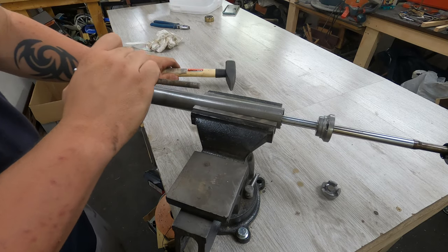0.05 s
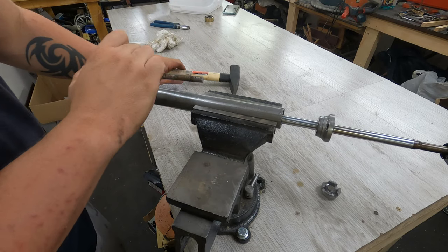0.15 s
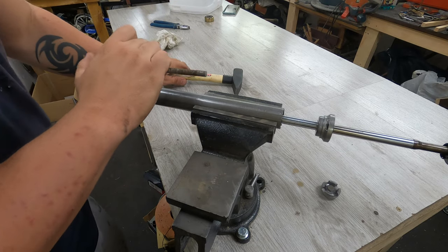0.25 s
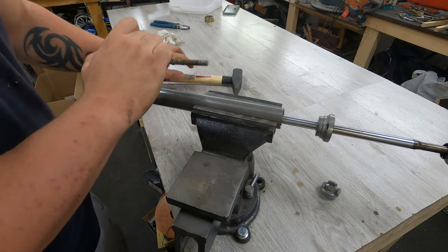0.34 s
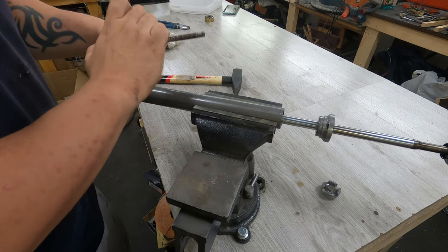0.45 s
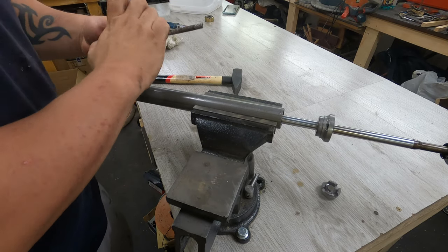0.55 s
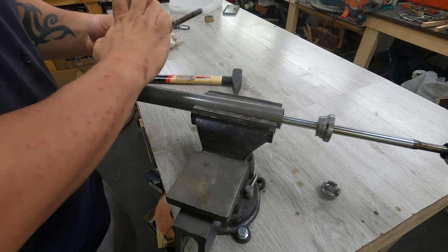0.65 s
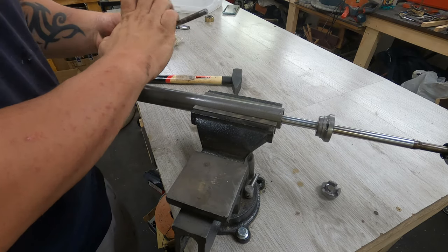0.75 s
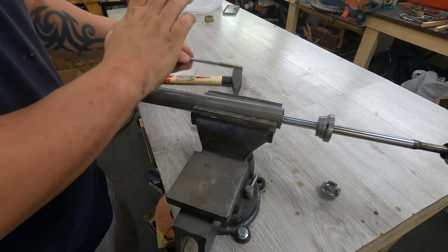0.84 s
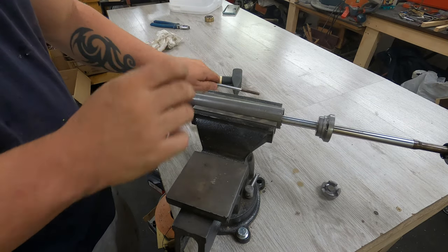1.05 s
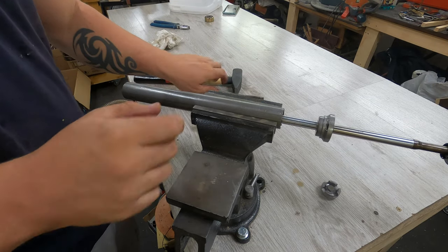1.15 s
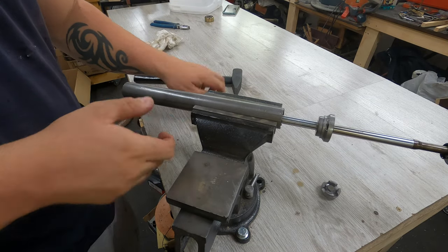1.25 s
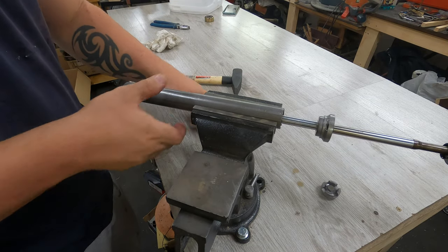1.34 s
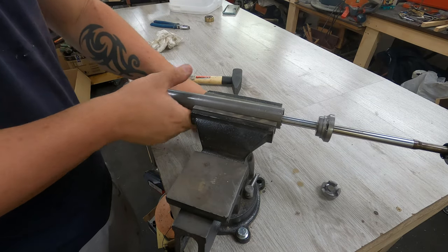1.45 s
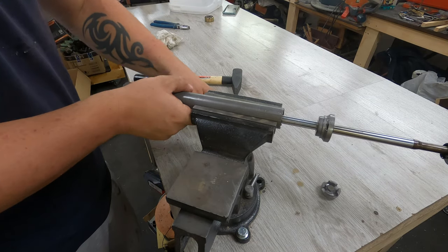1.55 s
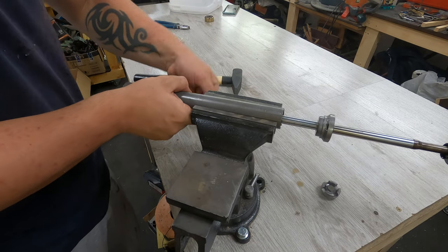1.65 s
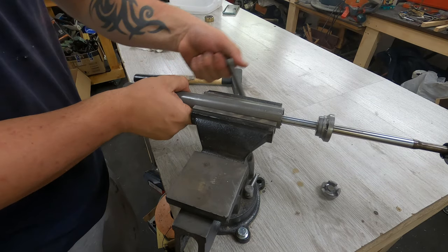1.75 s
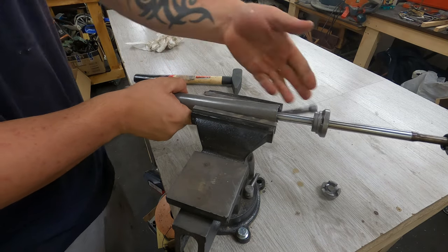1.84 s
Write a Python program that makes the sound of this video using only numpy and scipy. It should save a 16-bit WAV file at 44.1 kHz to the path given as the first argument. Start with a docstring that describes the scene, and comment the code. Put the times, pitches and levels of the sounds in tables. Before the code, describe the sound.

A steel tube thuds rapidly in a vise, a rod clanks against it, and after a short gap it lands with a ringing rattle; a small tap follows, over faint low hum in a small workshop, heard close in stereo.

```python
"""Steel parts at a bench vise

In a small, live workshop, with a stereo pair facing the vise almost straight on, steel parts are taken apart.
The tube thuds in the jaws, the rod clanks on it and is put down with a ping and a clatter; one light tap follows.
Each blow is a click and a noise crack, with decaying sine modes and a room response built from noise.
Behind it are two wavering hum tones, and shaped noise for the room air and a hand sliding on steel."""
import sys
import numpy as np
from scipy import signal
from scipy.fft import rfft, irfft
from scipy.io import wavfile

SR = 44100
rng = np.random.default_rng(int(sys.argv[2]) if len(sys.argv) > 2 else 0)


def output_pcm(signal):
    """Save a mono or channel-first signal as 16-bit PCM at the path in sys.argv[1].

    Samples are clipped to [-1, 1] before scaling.
    """
    pcm = np.clip(np.atleast_2d(signal).T, -1, 1) * 32767
    wavfile.write(sys.argv[1], SR, np.round(pcm).astype(np.int16))


N = 81585
BLOW_SIZE = 32768   # samples in the longest tail of a blow
TIME = np.arange(N) / SR   # s from the start of the scene
AGE = np.arange(BLOW_SIZE) / SR   # s from the start of a blow
BINS_HZ = np.maximum(np.fft.rfftfreq(BLOW_SIZE, 1 / SR), 1)

# hum: two tones and the level of each, (time [s], level [dB])
LOW_HUM_HZ, HIGH_HUM_HZ = 43.6, 97.9
LOW_HUM_LEVEL = [(0, -45.5), (.15, -45.5), (.3, -46.5), (.65, -54.5), (.9, -44.5), (1.1, -46.5), (1.3, -67),
                 (1.6, -48), (1.85, -66)]
HIGH_HUM_LEVEL = [(0, -57), (.7, -62), (.86, -51), (1.05, -60), (1.42, -65.5), (1.58, -48.5), (1.85, -54.5)]
# room air: (time [s], level [dB]), then its spectrum shape, (frequency [Hz], relative density [dB])
AIR_LEVEL = [(0, -46.5), (.22, -51.5), (.75, -51.5), (1.15, -50.5), (1.5, -54), (1.85, -48)]
AIR_COLOUR = [(20, -2.5), (45, 5), (70, -4.5), (110, -11), (160, -18), (320, -24), (500, -34.5), (800, -43),
              (1150, -34.5), (1800, -37.5), (2600, -43.5), (7000, -51), (9500, -61.5), (16000, -70.5)]
# hand sliding on steel: (time [s], level [dB]), then its shape, (frequency [Hz], relative density [dB])
BRUSH_LEVEL = [(0, -110), (.08, -89), (.14, -96), (.22, -85.5), (1.0, -100), (1.73, -83), (1.79, -63),
               (1.85, -72)]
BRUSH_COLOUR = [(300, -8.5), (1000, 0), (1800, 13), (2800, 0), (6500, 2.5), (9500, -7.5), (16000, -23)]

# likeness of left and right in diffuse sound: (frequency [Hz], likeness [0-1])
LIKENESS = [(100, 0.98), (300, 0.95), (700, 0.79), (1400, 0.7), (2800, 0.65), (5500, 0.37), (11000, .1)]
# decay of the workshop: (frequency [Hz], t60 [s])
ROOM_T60 = [(100, 1), (220, 0.36), (340, 0.2), (700, 0.26), (1500, 0.29), (3000, 0.31), (6000, 0.32),
            (12000, 0.39)]
# spectrum shape of the reflections: (frequency [Hz], relative level [dB])
ROOM_COLOUR = [(60, -5.5), (160, 1.5), (400, -3), (1000, 5), (2000, 3), (4000, -0.5), (7000, -6),
               (14000, -8)]
ROOM_BUILD_S, ROOM_PAN_DB = 0.0083, 1.65   # rise of the reflections; left over right

# blows: (time [s], level [dB], bass [dB], treble [dB], room [dB])
# light touches on the metal
TOUCHES = [(.1030, -30.5, -19, 6, -2), (1.5258, -12.5, -4, -21, 0), (1.8445, -21.5, 16, -2.5, 1.5)]
# a small steel part is tapped once
TAPS = [(1.5590, -1, 8.5, -2, -4)]
# the rod lands and rattles on the bench
CLATTER = [(1.1828, -16, -12, 4.5, -3), (1.1960, 4, 8, -1, -1), (1.2560, 0, 5.5, 14, 3.5),
           (1.2582, 13.5, -3.5, -9, -22), (1.3140, -3.5, 5.5, 3.5, 2.5), (1.3218, 3.5, -9, 7.5, 3),
           (1.3275, 0, 8, 1, -7), (1.3505, 2, 0, -12, -3), (1.3680, -2.5, -15, -0.5, -11),
           (1.3880, -3, -26.5, 5, 0)]
# the rod knocks on the tube
CLANKS = [(.4112, 9.5, 2, 2, 2), (.4722, 7, -0.5, -1.5, 4.5), (.5068, 4, -3, -12, 5)]
# the tube shifts in the vise
THUDS = [(.2338, -7, -0.5, -9.5, 1.5), (.2440, 16.5, -6.5, -2.5, 2), (.2800, 17, -3.5, -11.5, 2),
         (.2905, 14.5, -7, -15.5, -1), (.3225, 4, 14, -0.5, 0), (.3755, -2.5, 12, -8.5, -7.5)]

# colour of each kind of blow: (frequency [Hz], relative level [dB])
TOUCH_COLOUR = [(60, -7.5), (230, 7), (600, -4), (1000, -10), (2400, 2), (4500, -5.5), (7000, -21),
                (16000, -40.5)]
TAP_COLOUR = [(60, -14), (240, -15.5), (450, -3), (850, -7.5), (1350, 1), (1800, 1), (2100, -8),
              (2500, -7.5), (3000, -5.5), (4500, -9), (6000, -16.5), (9000, -35.5), (16000, -64)]
CLATTER_COLOUR = [(50, -44), (110, -9.5), (175, -3), (380, -4), (620, 1), (900, -9.5), (1450, -1.5),
                  (2300, -3.5), (2950, -2.5), (4000, -5.5), (5600, -7.5), (7500, -17.5), (8500, -27.5),
                  (11000, -40), (16000, -45)]
CLANK_COLOUR = [(50, -9.5), (140, 1.5), (500, -0.5), (900, -10.5), (1650, -5.5), (2100, -8.5), (2700, -4.5),
                (3400, -6.5), (4150, -3), (4800, -8), (5400, -6.5), (6200, -17.5), (7600, -21),
                (10000, -34), (16000, -56)]
THUD_COLOUR = [(50, -24), (110, -1.5), (200, 0), (480, -6.5), (700, -6), (1000, -12), (1600, -14.5),
               (3200, -20), (5500, -24), (7500, -31), (10000, -46), (16000, -77.5)]

# ringing parts: (frequency [Hz], energy against the click before colour and scatter [dB], t60 [s])
BENCH_MODES = [(101.1, -18, 0.74), (119.2, -24, 0.31), (164.5, -20, 0.53), (181, -19.5, 0.26),
               (243.34, -19.5, 0.76), (273, -27.5, 0.66), (317.8, -21, 0.33), (332.1, -23, 0.45),
               (448.7, -22.5, 0.23), (499, -28.5, 0.25), (787, -23, 0.12), (1000, -19.5, 0.21),
               (1130, -17.5, 0.087)]
VISE_MODES = [(174.8, -25.5, 0.25), (288, -26, 0.026), (493, -12.5, 0.019), (715, -15.5, .03),
              (983, -16, 0.069), (5300, -7.5, .008)]
TUBE_MODES = [(559.7, -17, .3), (1107, -23, .4), (1750, -13.5, 0.51), (2415, -22, .35), (3000, -19.5, 0.29),
              (3682, -13.5, 0.34), (3860, -32.5, 0.38), (4230, -18, 0.013), (4258, -32, 0.24),
              (5500, -21, 0.011), (5494, -21.5, 0.24)]
ROD_MODES = [(1450, -14, 0.019), (1539, -19.5, 0.22), (2750, -23.5, 0.14), (2800, -27, 0.21),
             (2984, -11.5, 0.0068), (3205, -23, 0.33), (3284, -14, 0.59), (4010, -30, 0.83),
             (4590, -23.5, 0.14), (5350, -15, 0.017), (5780, -27, 0.46)]
TAP_MODES = [(234.3, -12.5, 0.37), (398, -28.5, 0.34), (495, -22, 0.22), (636, -16, 0.097),
             (1359, -8, 0.083), (1803, -11.5, 0.039), (2450, -8, 0.034), (4400, -9, .025)]
MODE_SCATTER_DB = 1.0   # random spread of a mode's level
MODE_LAG_S = .00004   # each mode radiates its own way: spread of the delay between the ears

# rod's end singing as it touches down: (time [s], low modes [dB], high modes [dB], time until damped [s])
PINGS = [(1.1848, -1, -7, 0.018), (1.1971, -25, 2.5, 0.09), (1.322, -15, -7.5, 0.22)]
# tones of that end: (frequency [Hz], level before the ping's own [dB], t60 [s])
PING_MODES = [(2805, -44.5, 0.083), (5515, -33.5, 0.31), (9082, -46.5, 0.25), (9000, -49.5, 0.46),
              (13200, -67, 0.38), (15000, -66, .3)]
PING_SPLIT_HZ, PING_ROOM_DB = 7000, -7   # border of low and high modes; room level

BASS_HZ, TREBLE_HZ = 330, 3000   # corners of a blow's bass and treble
GRIT_HZ = 510   # the crack is gritty above this, a clean push below
BENDING_LAG_S, BENDING_HZ = 0.001057, 954   # bending waves reach the air this late at this pitch; lower ones later
METAL_PAN_DB, LEFT_LAG_S = 0.43, .000035   # the metal: left over right, and how late it is on the left
CUTOFF_HZ = 16400


def from_db(db):
    """Decibels to gain."""
    return 10 ** (np.asarray(db) / 20)


def at_hz(points, hz):
    """Read a table on a log-frequency axis."""
    table_hz, values = np.transpose(points)
    return np.interp(np.log(np.maximum(hz, 1)), np.log(table_hz), values)


def swell(points):
    """Gain over time from (time [s], level [dB]) points."""
    return from_db(np.interp(TIME, *np.transpose(points)))


def dying(t60):
    """Amplitude that falls 60 dB in t60 seconds."""
    return np.exp(-np.log(1000) * AGE / t60)


def unit(x):
    """Scale to a mean energy of one per channel."""
    return x / np.sqrt(np.mean(np.sum(x ** 2, axis=-1)))


def add(out, start_s, sound):
    """Mix a sound in at a time, fading the last quarter of its tail."""
    i = int(start_s * SR)
    fade = np.clip(4 * (1 - AGE / AGE[-1]), 0, 1) ** 2
    out[:, i:i + BLOW_SIZE] += (sound * fade)[:, :max(N - i, 0)]


def causal(db):
    """Minimum-phase response with this level at each frequency, by folding the cepstrum."""
    cepstrum = irfft(np.log(from_db(db)))
    cepstrum[1:BLOW_SIZE // 2] *= 2
    cepstrum[BLOW_SIZE // 2 + 1:] = 0
    return np.exp(rfft(cepstrum))


def diffuse(colour, size):
    """Coloured stereo noise, alike in the bass and nearly unrelated in the treble."""
    hz = np.fft.rfftfreq(size, 1 / SR)
    mid, side = rfft(rng.standard_normal((2, size)))
    alike = np.clip(at_hz(LIKENESS, hz), 0, 1)
    pair = np.sqrt(1 + alike) * mid + np.sqrt(1 - alike) * side * np.array([[1], [-1]])
    return irfft(pair * from_db(at_hz(colour, hz)) / np.sqrt(2), size)


def wavering(hz, wander_hz):
    """A low tone of rms 1 whose pitch wanders at random."""
    knots = np.linspace(0, N / SR, 20)
    pitch = hz + wander_hz * np.interp(TIME, knots, rng.standard_normal(len(knots)))
    return np.sqrt(2) * np.sin(2 * np.pi * np.cumsum(pitch) / SR)


def hum():
    """Two wavering sines that swell and sink, slightly stronger on the left."""
    low = swell(LOW_HUM_LEVEL) * wavering(LOW_HUM_HZ, wander_hz=1.1)
    high = swell(HIGH_HUM_LEVEL) * wavering(HIGH_HUM_HZ, wander_hz=1.4)
    return (low + high) * from_db([[.5], [-.5]])


def rustle(colour, level):
    """Room air or a sliding hand: diffuse noise of this colour, set to this level over time."""
    noise = diffuse(colour, N)
    return swell(level) * noise / noise.std()


def workshop():
    """Response of the room: reflections build up quickly and die band by band."""
    noise, out = rfft(diffuse(ROOM_COLOUR, BLOW_SIZE)), 0
    for k, (hz, t60) in enumerate(ROOM_T60):
        # a band peaks at its own frequency and reaches zero at its neighbours
        band = at_hz([(f, j == k) for j, (f, _) in enumerate(ROOM_T60)], BINS_HZ)
        envelope = unit(dying(t60) * (1 - np.exp(-AGE / ROOM_BUILD_S)))
        out = out + irfft(noise * band) * envelope
    return rfft(out * from_db([[ROOM_PAN_DB / 2], [-ROOM_PAN_DB / 2]]))


def ringing(modes):
    """Decaying sines of a struck part, each with its own small delay between left and right."""
    out = 0
    for hz, db, t60 in modes:
        strength, side = rng.standard_normal(2)
        lag = MODE_LAG_S * side * np.array([[.5], [-.5]])
        tone = unit(np.sin(2 * np.pi * hz * (AGE - lag)) * dying(t60))
        out = out + from_db(db + MODE_SCATTER_DB * strength) * tone
    return out


def blows(rows, colour, modes, crack_t60, grit):
    """Each blow is a click, spread by its way through the steel, and a gritty crack; then modes and room."""
    out, room = np.zeros((2, N)), workshop()
    bass = 1 / (1 + (BINS_HZ / BASS_HZ) ** 2)
    treble = 1 / (1 + (TREBLE_HZ / BINS_HZ) ** 2)
    push = 1 / (1 + 1j * BINS_HZ / GRIT_HZ)
    # phase whose delay grows as the pitch falls, as in bending waves
    click = irfft(np.exp(-2j * np.pi * 2 * BENDING_LAG_S * np.sqrt(BENDING_HZ * BINS_HZ)))
    for start_s, db, bass_db, treble_db, room_db in rows:
        white = diffuse([(100, 0), (10000, 0)], BLOW_SIZE)
        crack = unit(white * dying(crack_t60))
        contact = push * rfft(click) + (1 - push) * rfft(unit(click + grit * crack))
        tone = causal(db + at_hz(colour, BINS_HZ) + bass_db * bass + treble_db * treble)
        sound = contact + rfft(ringing(modes)) + from_db(room_db) * room
        add(out, start_s, irfft(tone * sound))
    return out


def pings():
    """Thin clear sines of the rod, choked when it lies flat, with some room."""
    out = np.zeros((2, N))
    for start_s, low_db, high_db, damped_s in PINGS:
        ring = 0
        for hz, db, t60 in PING_MODES:
            level = from_db(db + (low_db if hz < PING_SPLIT_HZ else high_db))
            ring = ring + level * np.sin(2 * np.pi * hz * AGE) * dying(t60)
        ring = ring * np.exp(-(AGE / damped_s) ** 4)
        add(out, start_s, irfft(rfft(ring) * (1 + from_db(PING_ROOM_DB) * workshop())))
    return out


def steel():
    """All the metal, almost straight ahead: a hair louder and a hair later on the left."""
    metal = (blows(THUDS, THUD_COLOUR, BENCH_MODES + VISE_MODES, crack_t60=.022, grit=1.0)
             + blows(CLANKS, CLANK_COLOUR, BENCH_MODES + TUBE_MODES, crack_t60=0.017, grit=1.9)
             + blows(CLATTER, CLATTER_COLOUR, BENCH_MODES + ROD_MODES, crack_t60=0.016, grit=1.64)
             + blows(TAPS, TAP_COLOUR, TAP_MODES, crack_t60=0.027, grit=3.7)
             + blows(TOUCHES, TOUCH_COLOUR, BENCH_MODES, crack_t60=0.046, grit=4.1)
             + pings())
    metal[0] = np.interp(TIME - LEFT_LAG_S, TIME, metal[0])
    return metal * from_db([[METAL_PAN_DB / 2], [-METAL_PAN_DB / 2]])


def scene():
    """The steel at the vise over room air, a brushing hand and the hum."""
    return steel() + rustle(AIR_COLOUR, AIR_LEVEL) + rustle(BRUSH_COLOUR, BRUSH_LEVEL) + hum()


def record(dry):
    """The top is cut steeply by a low-pass filter."""
    lowpass = signal.cheby2(12, 70, CUTOFF_HZ, fs=SR, output="sos")
    return signal.sosfilt(lowpass, dry)


dry = scene()
out = record(dry)
output_pcm(out)
```